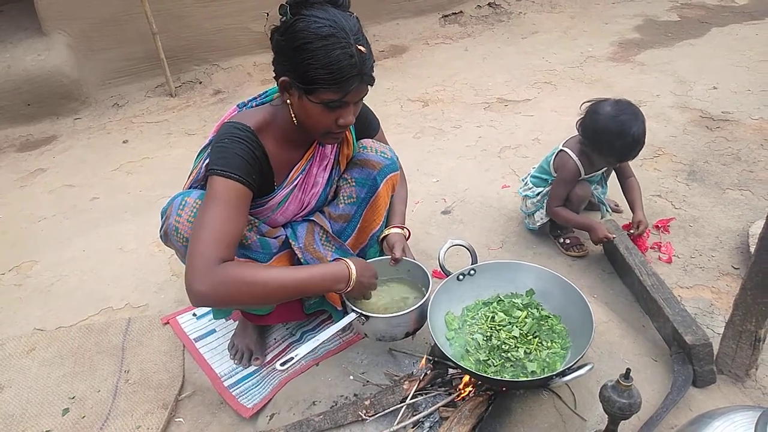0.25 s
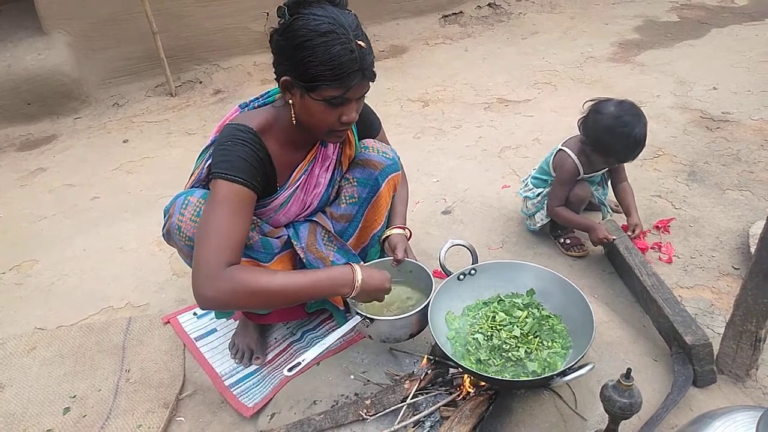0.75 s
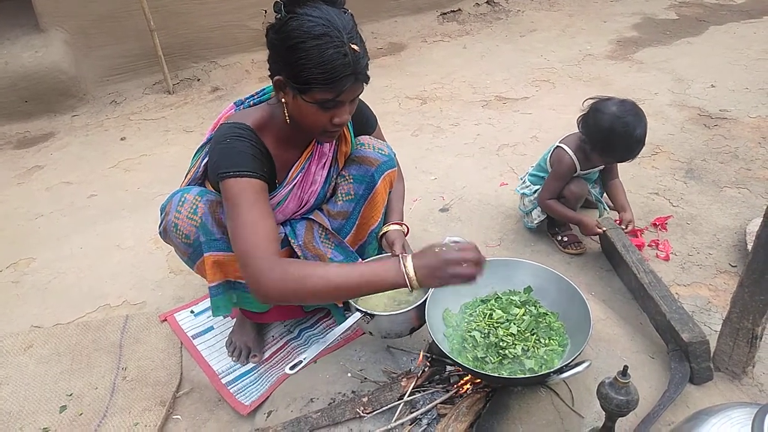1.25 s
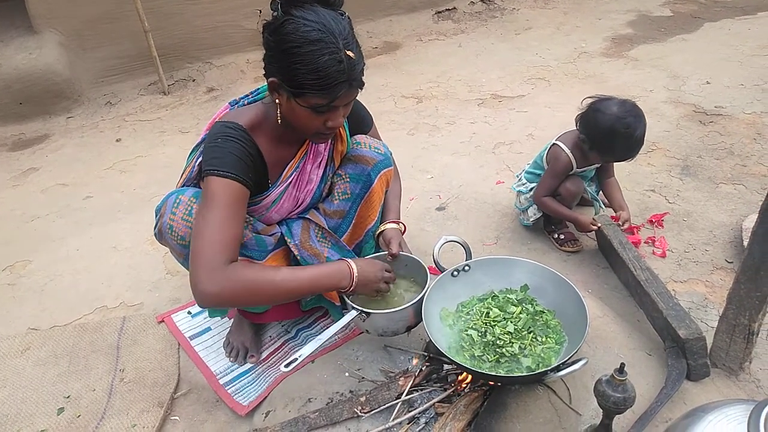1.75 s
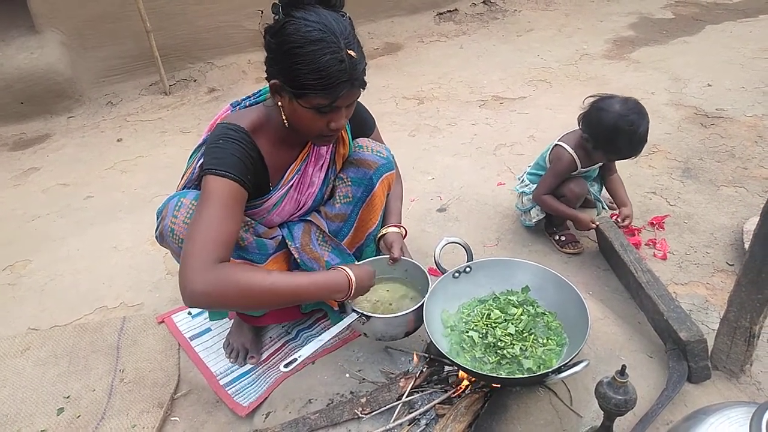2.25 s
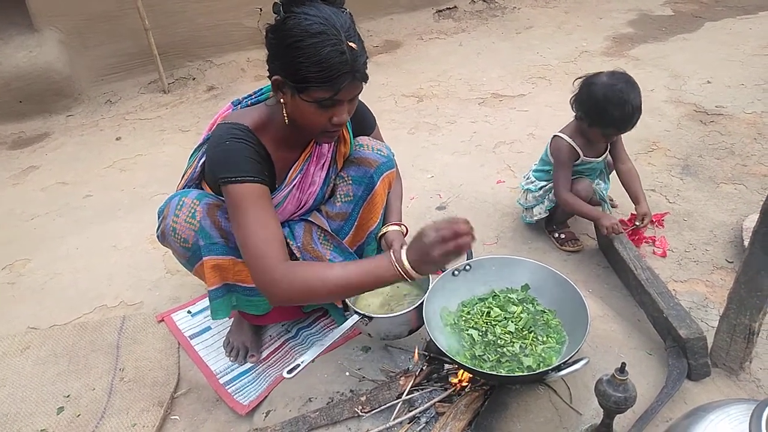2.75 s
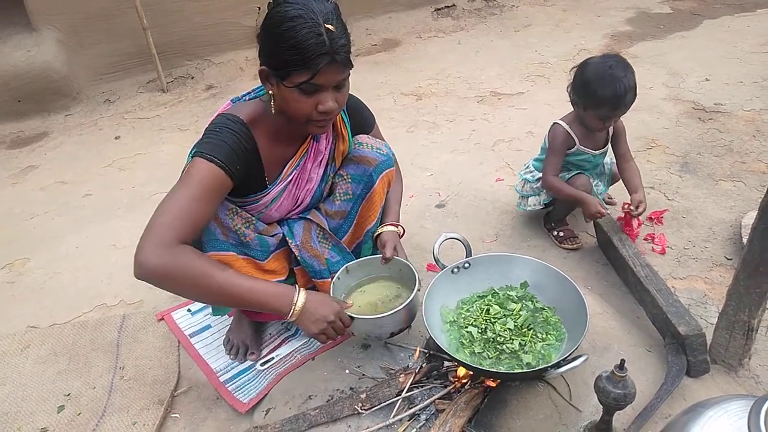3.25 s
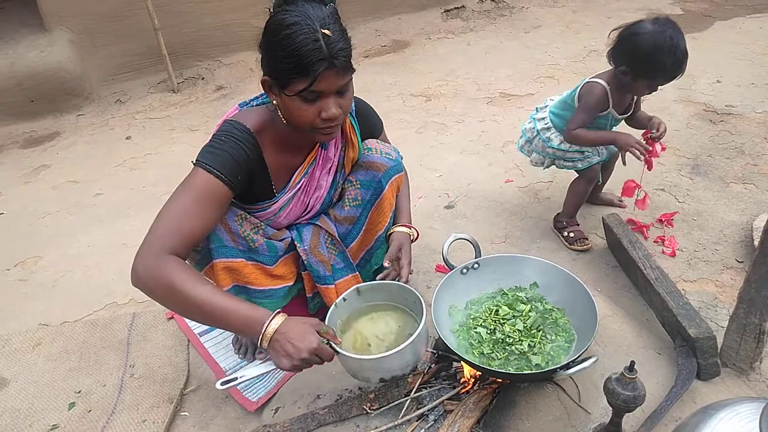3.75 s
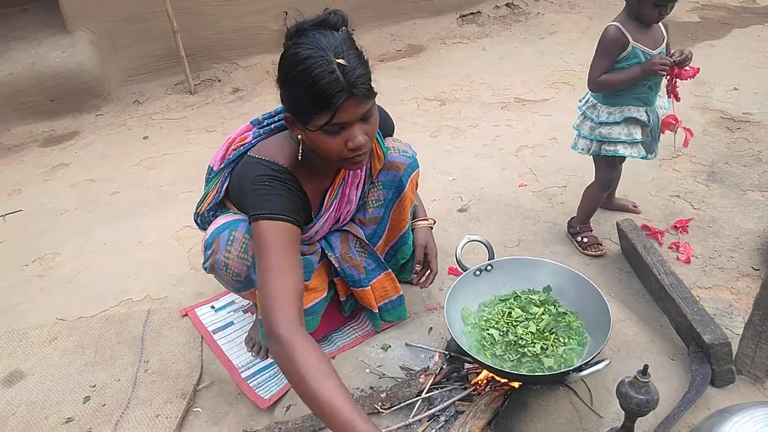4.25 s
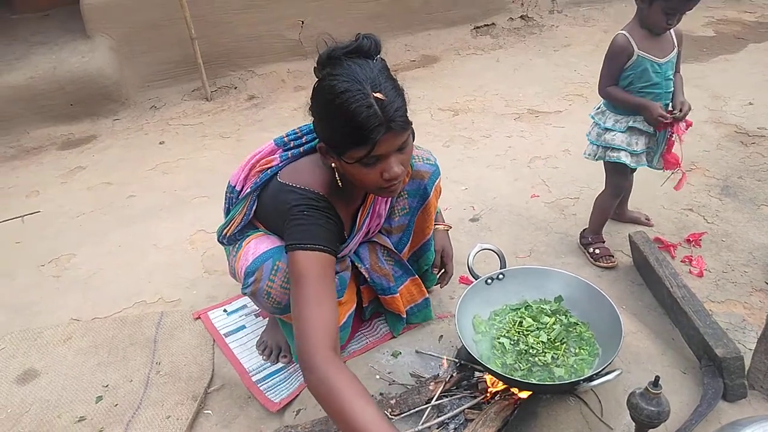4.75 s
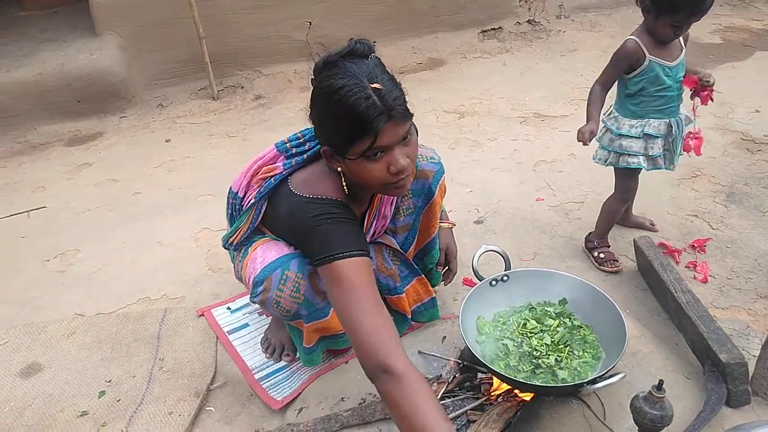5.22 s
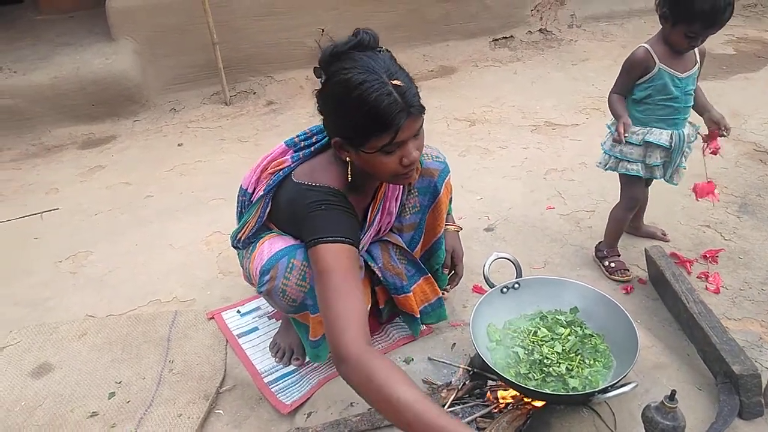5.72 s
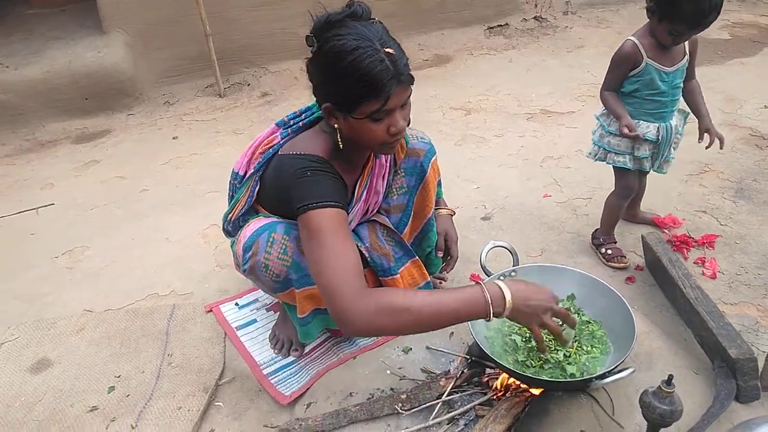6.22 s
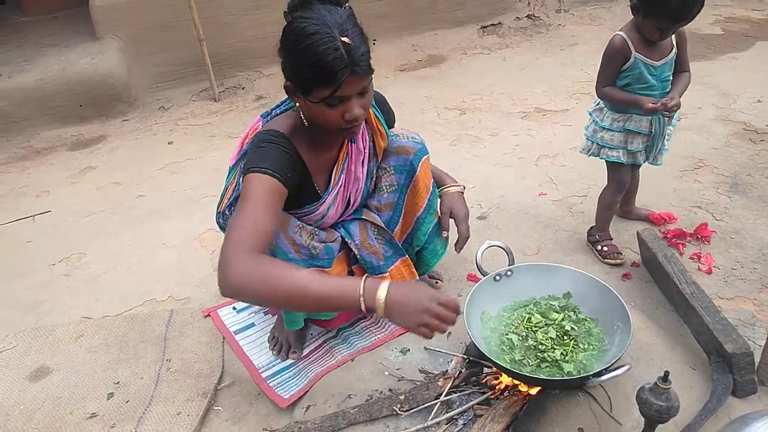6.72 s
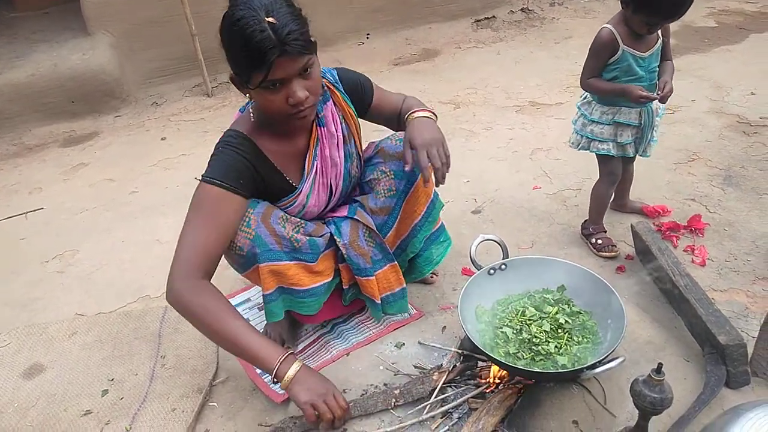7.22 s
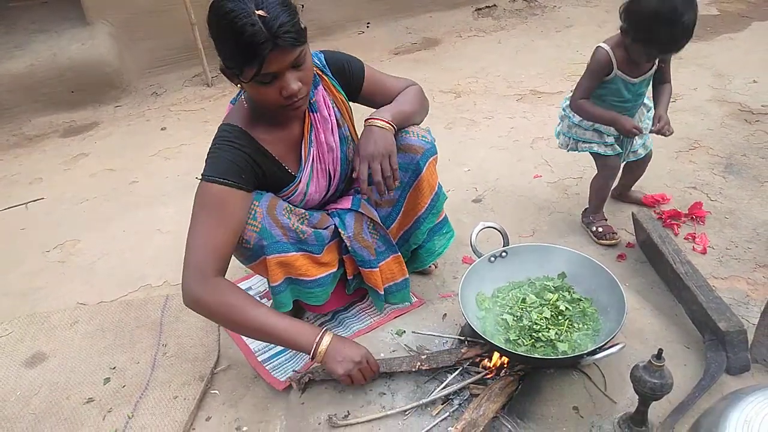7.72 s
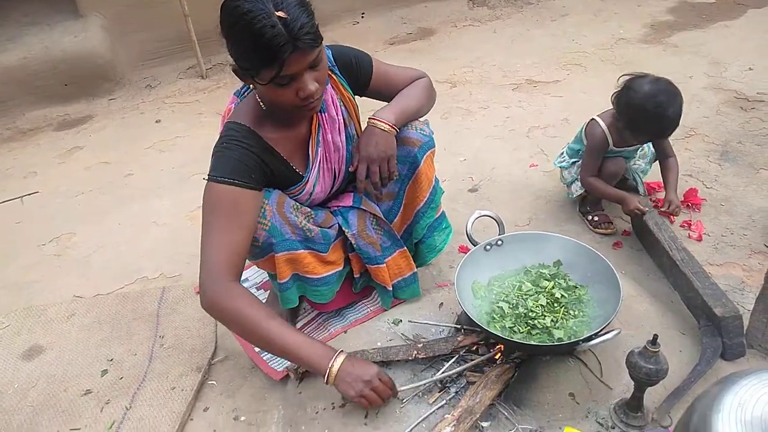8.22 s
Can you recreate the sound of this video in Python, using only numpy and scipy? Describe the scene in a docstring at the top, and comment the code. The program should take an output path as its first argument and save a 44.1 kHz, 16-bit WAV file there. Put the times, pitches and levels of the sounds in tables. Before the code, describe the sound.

Steady frying hiss in a quiet yard, with bangle clinks, a pot set on earth, ladle knocks, scraping tinware, then soft firewood bumps.

```python
"""Outdoor cooking in a yard, one microphone a step or two away: greens hiss in a pan over a wood fire throughout,
as shaped noise that sizzles up with bursts of droplets and steam when they are sprinkled or touched.
Bangles clink on the cook's wrist as struck modes, a steel pot of water is set on the ground, a ladle knocks against it,
and a steel tin is rattled and scraped until its lid rings free. Last, firewood is pushed under the pan with
thuds and rustles. A noise suppressor in the recorder hollows out the quietest bands; a thin whine lies over it all."""
import sys
import numpy as np
from scipy import signal
from scipy.fft import irfft
from scipy.io import wavfile
from scipy.ndimage import uniform_filter1d

SR = 44100
rng = np.random.default_rng(int(sys.argv[2]) if len(sys.argv) > 2 else 0)


def master_out(mix):
    """Clip the mix to full scale and print it as 16-bit PCM to the path in sys.argv[1]."""
    frames = np.transpose(np.atleast_2d(mix))
    ceiling = np.clip(frames, -1, 1)
    pcm = np.round(ceiling * 32767).astype(np.int16)
    wavfile.write(sys.argv[1], SR, pcm)


N = 373730
TIME = np.arange(N) / SR
AFTER = np.arange(2 ** 15) / SR  # time since a blow [s]
BINS = len(AFTER) // 2 + 1  # spectrum bins of one blow

# Spectra of the pan's steady hiss and brighter sizzle: (frequency [Hz], relative level [dB per Hz])
HISS = [(50, -13), (330, -28.5), (800, -21), (1120, -12), (1960, -2.5), (2400, -18.5), (3200, -18.5),
        (3700, -12.5), (5150, -6.5), (6050, -11.5), (6700, -28), (7700, -27.5), (8400, -13), (12500, -12),
        (16000, -26.5)]
SIZZLE = [(430, -50), (620, -10.5), (1150, 4), (1950, 4.5), (2400, -0.5), (2800, -16.5), (3500, -2.5),
          (5400, -2), (6400, -4), (7300, -16.5), (8400, -5.5), (11000, -1), (13000, -10), (16000, -13)]
# Spectrum of the steam, thinner than the hiss in the bass: (frequency [Hz], relative level [dB per Hz])
STEAM = [(350, -41.5), (650, -26), (1200, -11), (1950, 2.5)] + HISS[5:]
# Moisture meets the hot pan: (time [s], rise [s], hold [s], t60 [s], steam level [dB], spatter level [dB])
SIZZLES = [(1.476, 0.0079, 0.5, 0.57, -54.5, -57.5), (2.969, 0.12, 0.13, 1.06, -55.5, -47.5),
           (6.343, 0.2, 0.056, 5, -52.5, -46)]
# Strong modes of each steel vessel or tool: (frequency [Hz], level [dB], t60 [s])
POT_MODES = [(262, -2, 0.11), (703, -9.5, 0.64), (877, -13, 0.52), (1247, -7, 0.92), (1460, -6, 0.16),
             (1510, -12, 0.52), (1906, -12, 0.41)]
LADLE_MODES = [(1458, 1, 0.32), (3750, -2.5, 0.15), (4900, -8, 0.25)]
TIN_MODES = [(228, -27, 0.15), (1056, -9, 0.39), (1351, -2.5, 0.17), (1530, -3.5, 0.41), (2150, -6.5, 0.14),
             (3550, -20, 0.31), (5290, -2, 0.097)]
LID_MODES = [(258, -25.5, 0.34), (1043, -1, 0.28), (1344, -3, 0.17), (2240, -17, 0.074), (2580, -13, 0.15),
             (2890, -2.5, 0.1), (3780, -5, 0.095), (6240, 9, 0.027)]
# Crowded, short-lived modes of thin steel, low and high: (frequency [Hz], relative level [dB per Hz])
CLANK = [(330, -63), (540, -19.5), (900, -11.5), (1250, -5.5), (1600, -3.5), (1850, -6), (2250, -4),
         (2750, -15.5), (3500, -32.5)]
CLINK = [(500, -44), (1700, -35), (3000, -5.5), (3800, 0), (4800, 2), (5800, 0.5), (6700, -10), (9500, -6),
         (12500, -8.5), (16000, -25)]
# Blows on each piece of steel: (time [s], clank level [dB], clink level [dB], ring level [dB])
POT_BLOWS = [(4.4445, -33.5, -45.5, -34.5)]
LADLE_BLOWS = [(4.602, -48, -43, -56), (4.652, -47.5, -33, -44.5), (4.7045, -38.5, -33, -36),
               (4.745, -50, -45.5, -60)]
TIN_BLOWS = [(5.017, -40.5, -35, -30), (5.025, -39, -39, -34), (5.047, -38, -29, -36),
             (5.057, -36, -33, -50), (5.068, -46, -51, -27.5), (5.109, -38, -36.5, -51),
             (5.1465, -30.5, -30, -38), (5.161, -40, -49, -38), (5.18, -35.5, -29.5, -52),
             (5.256, -42, -41.5, -60), (5.362, -47.5, -32.5, -44)]
LID_BLOWS = [(5.416, -37, -39, -55), (5.433, -31.5, -39, -55), (5.4475, -26, -27, -54),
             (5.463, -27, -40, -38), (5.476, -35, -37, -38), (5.494, -29.5, -31.5, -26)]
# Strokes of steel on steel: (time [s], length [s], level at the end [dB])
SCRAPES = [(4.72, 0.074, -44), (5.015, 0.058, -37.5), (5.157, 0.14, -50), (5.357, 0.134, -36.5)]
# Slipping contacts, gliding as the contact moves: two faint squeaks of handling, then steel slipping on steel:
# (time [s], glide time [s], start frequency [Hz], end frequency [Hz], level [dB])
SQUEAKS = [(2.385, 0.04, 2430, 2420, -59), (3.472, 0.019, 2460, 2520, -60),
           (5.235, 0.0041, 5800, 5440, -33), (5.2383, 0.0029, 5400, 3330, -26.5),
           (5.256, 0.0062, 5440, 5280, -30), (5.2635, 0.0042, 5080, 4740, -30),
           (5.248, 0.0265, 860, 1343, -41.5), (5.277, 0.018, 3800, 2870, -45.5),
           (5.303, 0.019, 1410, 1840, -44), (5.362, 0.0099, 1500, 1520, -28),
           (5.379, 0.023, 3750, 3440, -38.5), (5.38, 0.022, 1610, 1500, -34),
           (5.413, 0.027, 1580, 1286, -33), (5.447, 0.0098, 1530, 1730, -20.5),
           (5.473, 0.022, 1498, 1234, -24.5), (5.576, 0.018, 4750, 5000, -46),
           (5.695, 0.013, 1910, 2160, -46), (5.755, 0.0045, 5720, 3660, -36)]
# The pot is swung down, pushed into place and settled: (time [s], length [s], level [dB])
POT_RUBS = [(3.69, 1, -73), (4.59, 0.22, -57.5), (4.88, 0.43, -60.5)]
# Hum of the hollow above the water: (frequency [Hz], relative level [dB per Hz])
HOLLOW = [(480, -29.5), (780, -2), (1250, -46), (2500, -16.5), (5000, -71)]
# Water slopping in the pot: (time [s], glide time [s], start frequency [Hz], end frequency [Hz], level [dB])
SLOPS = [(2.07, 0.056, 540, 620, -68), (2.43, 0.049, 453, 555, -69), (3.892, 0.047, 562, 574, -54),
         (3.912, 0.024, 558, 413, -52.5)]
# Modes of the bangles: (frequency [Hz], level [dB], t60 [s])
BANGLE_MODES = [(1994, -0.5, 0.056), (3580, -3, 0.074), (4870, 0, 0.049), (5400, 12, 0.021),
                (7470, -5.5, 0.1), (9250, -4.5, 0.071), (11350, -6, 0.076)]
# Bangles touch: (time [s], level [dB], favoured frequency [Hz])
BANGLE_TOUCHES = [(1.239, -48, 8200), (1.328, -47, 5300), (1.339, -37.5, 11000), (1.3959, -34.5, 12700),
                  (1.411, -33.5, 9100), (1.428, -44, 4700), (1.442, -39.5, 4260), (1.447, -41, 5340),
                  (2.8146, -47.5, 9200), (2.8962, -42, 11700), (2.9476, -46, 7300)]
# Light taps of utensils and dry sticks: (time [s], clank level [dB], clink level [dB])
TAPS = [(0.15, -58, -66), (1.486, -55, -57), (5.638, -61, -44), (5.7627, -44, -49.5), (6.141, -53, -59),
        (6.1937, -53.5, -46), (6.2486, -53.5, -43.5), (7.586, -44, -44), (7.622, -54, -53),
        (7.707, -57, -52)]
# Dull bumps on packed earth: (time [s], level [dB], centre frequency [Hz])
THUDS = [(0.294, -62.5, 193), (4.444, -43.5, 212), (4.603, -50.5, 200), (4.654, -49, 195),
         (4.704, -48, 200), (4.91, -63.5, 189), (5.239, -53.5, 255), (6.573, -59.5, 160), (7.515, -61, 239),
         (7.586, -57, 510), (7.705, -49, 362)]
# Cloth, hands and dry sticks brush past: (time [s], length [s], level [dB])
RUSTLES = [(.81, 0.036, -67), (6.166, 0.048, -49.5), (7.465, 0.1, -53.5), (7.57, 0.065, -59.5),
           (8.185, 0.06, -57.5)]
# Spectrum of dry fibres: (frequency [Hz], relative level [dB per Hz])
DRY_FIBRES = [(300, -53), (620, -6.5), (1150, -13), (1950, -1), (2700, -11), (3500, -8.5),
              (5400, -5), (7300, -22), (9500, -8), (16000, -27.5)]
# Threshold of the recorder's noise suppressor: (frequency [Hz], level in a narrow band [dB])
QUIET = [(300, -112), (1000, -82.5), (2700, -83.5), (4000, -73.5), (7500, -87), (9000, -102)]

HISS_DB = -57.5
SPATTER_HOLD, SPATTER_T60_S = 0.36, 2.32  # share of the steam's hold time, and longest decay
WALL_DELAY_S, WALL_DB = 0.00262, -16.5  # the pan's curved wall throws its own sizzle back
CLATTER_T60_S, FIRM_DB = 0.059, -31  # clatter of a blow at least this firm
DOUBLING_DB = 7.5  # lighter contact damps less: t60 doubles for each such step under firm
CLINK_T60_S = 0.14  # longest decay of the high clatter
SHIMMER_T60_S, SHIMMER_CLINK_DB = 0.47, -7  # weak modes linger under the ring, the high part fainter
TWIN_SPLIT, TWIN_DB = 0.013, -14  # nothing is perfectly round: a weaker twin, lower by this share, beats
SCRAPE_GROWTH_DB, SCRAPE_T60_S = 11, 0.019
RUB_RISE_S, RUB_T60_S = 0.0081, 0.37
BANGLE_TICK_DB, BANGLE_FOCUS_DB = -10.5, 13
TAP_T60_S, TICK_T60_S = 0.16, 0.067  # the body of a tap, and its bright tick
THUD_CYCLES = 45  # a bump dies by 60 dB in this many cycles
RUSTLE_RISE_S, RUSTLE_T60_S = 0.021, 0.74
WHINE_HZ, WHINE_DB, EDGE_HZ = 14000, -68.5, 16200


def pan():
    """Steady hiss; on hot metal droplets burst first, steam hisses on, and the wall's echo makes it hollow."""
    hiss = amp(HISS_DB) * unit(colour(patchy_noise(patchy_db=3.5), HISS))
    droplets = unit(patchy_noise(patchy_db=2.2)) + amp(-3) * unit(grains(per_s=700, spread_db=5))
    spatter = unit(colour(droplets, SIZZLE))
    steam = unit(colour(patchy_noise(patchy_db=1), STEAM))
    direct = hiss
    for s, rise, hold, t60, steam_db, spatter_db in SIZZLES:
        direct = direct + amp(steam_db) * swell(s, rise, hold, t60) * steam
        spattering = swell(s, rise, SPATTER_HOLD * hold, min(t60, SPATTER_T60_S))
        direct = direct + amp(spatter_db) * spattering * spatter
    echo = np.interp(TIME - WALL_DELAY_S, TIME, direct)
    return direct + amp(WALL_DB) * echo


def steel(blows, modes, pitch, shimmer_db):
    """Each blow clatters crowded modes (lower in a big vessel); strong modes ring over a faint shimmer."""
    out = np.zeros(N)
    low, high = crowd(spacing_hz=16), crowd(spacing_hz=30.1)
    clank = [(hz * pitch, db) for hz, db in CLANK]
    for s, clank_db, clink_db, ring_db in blows:
        lightness_db = max(FIRM_DB - max(clank_db, clink_db), 0)
        t60 = CLATTER_T60_S * 2 ** (lightness_db / DOUBLING_DB)
        low_clatter = clatter(low * strike_point(uneven_db=4), clank, t60)
        high_clatter = clatter(high * strike_point(uneven_db=6), CLINK, min(t60, CLINK_T60_S))
        add(out, s, amp(clank_db) * low_clatter)
        add(out, s, amp(clink_db) * high_clatter)
        shimmer = clatter(low, clank, SHIMMER_T60_S)
        shimmer = shimmer + amp(SHIMMER_CLINK_DB) * clatter(high, CLINK, SHIMMER_T60_S)
        add(out, s, amp(ring_db) * (ring(modes, uneven_db=2.2) + amp(shimmer_db) * shimmer))
    return out


def scrape():
    """Small slips keep thin steel chattering, pressed harder as they go; it sings on faintly after."""
    low_body = clatter(1, [(650, -28)] + CLANK[2:], 0.048)
    body = low_body + amp(3.5) * clatter(1, CLINK, 0.011)
    pressure = np.zeros(N)
    for s, length, end_db in SCRAPES:
        remaining = np.clip(1 - (TIME - s) / length, 0, 1)
        stroke = swell(s, 0.0024, length, SCRAPE_T60_S)
        singing_on = amp(-12) * swell(s, length, 0, 1)
        pressure += amp(end_db - SCRAPE_GROWTH_DB * remaining) * (stroke + singing_on)
    slips = grains(per_s=3000, spread_db=4.5)
    return pressure * unit(signal.oaconvolve(slips, body)[:N])


def glides(table, jitter_hz):
    """Squeaks and slops: a resonance glides unsteadily, swells quickly, then fades at its end pitch."""
    out = np.zeros(N)
    for s, length, start_hz, end_hz, db in table:
        u = np.linspace(0, 2, int(2 * length * SR))  # time in glide times
        wander = unit(smooth(rng.standard_normal(len(u)), 50, 36))
        hz = np.interp(u, [0, 1], [start_hz, end_hz]) + jitter_hz * wander
        envelope = (u * np.e / 0.4) ** 2 * np.exp(-2 * u / 0.4)  # peaks at one, at u = 0.4
        tone = np.sqrt(2) * np.sin(2 * np.pi * np.cumsum(hz) / SR)
        add(out, s, amp(db) * envelope * tone)
    return out


def rubbed_pot():
    """Water and grit rub the pot, which hums in the hollow above the water."""
    rubs = grains(per_s=2200, spread_db=0)
    return strokes(POT_RUBS, RUB_RISE_S, RUB_T60_S) * unit(colour(rubs, HOLLOW))


def bangles():
    """Thin rings tick and ring briefly, damped by the wrist; each touch favours other modes."""
    out = np.zeros(N)
    for s, db, favoured_hz in BANGLE_TOUCHES:
        tick_spectrum = [(2500, -24), (3800, -5), (favoured_hz, 0), (favoured_hz * 3, -18)]
        tick = clatter(crowd(spacing_hz=102), tick_spectrum, 0.012)
        modes = []
        for hz, level, t60 in BANGLE_MODES:
            octaves_off = abs(np.log2(hz / favoured_hz))
            modes.append((hz, level - BANGLE_FOCUS_DB * octaves_off ** 0.5, t60))
        add(out, s, amp(db) * (ring(modes, uneven_db=7) + amp(BANGLE_TICK_DB) * tick))
    return out


def taps():
    """Damped knocks: a sharp tick over a short, dull body that leaves no ring."""
    out = np.zeros(N)
    for s, clank_db, clink_db in TAPS:
        add(out, s, amp(clank_db) * clatter(1, CLANK, TAP_T60_S))
        add(out, s, amp(clink_db) * clatter(1, CLINK, TICK_T60_S))
    return out


def thuds():
    """Pot, feet and firewood bump the ground with a low, broad resonance."""
    out = np.zeros(N)
    for s, db, hz in THUDS:
        hump = [(hz / 3, -28), (hz / 1.65, -2), (hz * 1.326, 0), (hz * 2.04, -19), (hz * 6, -60)]
        add(out, s, amp(db) * clatter(1, hump, THUD_CYCLES / hz))
    return out


def rustles():
    """Dry fibres catch and slip in a fine, uneven crackle."""
    fibres = unit(patchy_noise(patchy_db=6.5)) + unit(grains(per_s=480, spread_db=6.5))
    catching_db = 2 * unit(smooth(rng.standard_normal(N), 1200, 400))
    brushing = strokes(RUSTLES, RUSTLE_RISE_S, RUSTLE_T60_S) * amp(catching_db)
    return brushing * unit(colour(fibres, DRY_FIBRES))


def yard(x, wet_db, t60):
    """Ground and mud walls return a faint, short scatter."""
    tail = rng.standard_normal(len(AFTER)) * amp(-60 * AFTER / t60)
    tail = tail * (AFTER > 0.008)  # nothing returns sooner [s]
    return x + amp(wet_db) * signal.oaconvolve(x, tail / np.linalg.norm(tail))[:N]


def suppress(x, slope, depth_db):
    """Noise suppressor: the further a narrow band falls under the threshold, the more it is turned down."""
    hz, _, z = signal.stft(x, SR, nperseg=1024, noverlap=768)
    power = uniform_filter1d(abs(z) ** 2, size=3, axis=-2)
    power = uniform_filter1d(power, size=7, axis=-1)
    threshold_db = np.interp(hz, *np.transpose(QUIET))[:, None]
    under_db = threshold_db - 10 * np.log10(abs(power) + 1e-20)
    gain = amp(-np.clip(slope * under_db, 0, depth_db))
    return signal.istft(z * gain, nperseg=1024, noverlap=768)[1][:, :N]


def ring(modes, uneven_db):
    """Damped pairs of modes that beat; each blow lands elsewhere and shares its energy differently."""
    twins = [(hz * (1 - TWIN_SPLIT), db + TWIN_DB, t60) for hz, db, t60 in modes]
    out = np.zeros(len(AFTER))
    for hz, db, t60 in list(modes) + twins:
        level_db = db + uneven_db * rng.standard_normal() - 60 * AFTER / t60
        out += amp(level_db) * np.sin(2 * np.pi * (hz * AFTER + rng.random()))
    onset = 1 - np.exp(-AFTER / 0.0028)  # the ring builds up over a few cycles
    return onset * out


def crowd(spacing_hz):
    """Picks the frequencies of a crowd of modes, as a mask on the spectrum."""
    return rng.random(BINS) < SR / len(AFTER) / spacing_hz


def strike_point(uneven_db):
    """Where a blow lands decides which groups of modes it favours: a lumpy gain over frequency."""
    lumps = smooth(rng.standard_normal(BINS), 220, 120)
    return amp(uneven_db * np.tanh(unit(lumps)))


def clatter(mask, spectrum, t60):
    """A crowd of modes struck at once and dying away, with an early rms of about one."""
    modes = irfft(mask * np.exp(2j * np.pi * rng.random(BINS)))
    envelope = amp(-60 * AFTER / t60) * (1 - np.exp(-AFTER / 0.001))
    x = colour(modes * envelope, spectrum)
    early_share = 1 - amp(-60 * 0.01 / t60) ** 2  # energy share of the first hundredth of a second
    return x / np.sqrt(early_share * np.sum(x ** 2) / (SR / 100))


def patchy_noise(patchy_db):
    """Noise drifting in small patches of time and frequency, less so in the deep bass and the treble."""
    hz, _, z = signal.stft(rng.standard_normal(N), SR, nperseg=1024, noverlap=768)
    patches = uniform_filter1d(rng.standard_normal(z.shape), size=4, axis=0)
    patches = uniform_filter1d(patches, size=11, axis=1)
    depth_db = patchy_db * (hz / (hz + 150) / (1 + (hz / 6500) ** 4))[:, None]
    return signal.istft(z * amp(depth_db * unit(patches)), nperseg=1024, noverlap=768)[1][:N]


def grains(per_s, spread_db):
    """Random clicks, most small and a few large; all equal at zero spread."""
    size_db = spread_db * np.minimum(rng.exponential(1, N), 3.5)
    return (rng.random(N) < per_s / SR) * rng.choice([-1, 1], N) * amp(size_db)


def swell(s, rise, hold, t60):
    """Gain over time: rises from time s, holds, then dies away."""
    dying_s = np.maximum(TIME - s - rise - hold, 0)
    return np.clip((TIME - s) / rise, 0, 1) * amp(-60 * dying_s / t60)


def strokes(table, rise, t60):
    """Gain over time of rubbing strokes that share one attack and release."""
    return sum(amp(db) * swell(s, rise, length - rise, t60) for s, length, db in table)


def colour(x, spectrum):
    """Causal (minimum-phase) filter from (Hz, dB) points joined on a log-frequency axis."""
    hz, db = np.transpose(spectrum)
    f = abs(np.fft.fftfreq(4096, 1 / SR)) + 1
    log_gain = np.log(amp(np.interp(np.log(f), np.log(hz), db)))
    response = np.exp(signal.hilbert(log_gain).conj())
    impulse = np.fft.ifft(response).real[:len(f) // 2]
    return signal.oaconvolve(x, impulse)[:len(x)]


def smooth(x, first, second):
    """Two running means, with widths in samples or bins."""
    return uniform_filter1d(uniform_filter1d(x, size=first), size=second)


def amp(db):
    """Decibels to gain."""
    return 10 ** (np.asarray(db) / 20)


def unit(x):
    """Scales to an rms of one."""
    return x / np.sqrt(np.mean(x ** 2) + 1e-20)


def add(mix, s, sound):
    """Lays a sound into the mix at time s."""
    part = mix[round(s * SR):][:len(sound)]
    part += sound[:len(part)]


def scene():
    """All sources, a step or two from one microphone; the pan is heard without the yard's scatter."""
    pot = steel(POT_BLOWS, POT_MODES, pitch=0.64, shimmer_db=-10) + rubbed_pot()
    ladle = steel(LADLE_BLOWS, LADLE_MODES, pitch=0.81, shimmer_db=-13)
    tin = steel(TIN_BLOWS, TIN_MODES, pitch=0.87, shimmer_db=-16)
    lid = steel(LID_BLOWS, LID_MODES, pitch=0.96, shimmer_db=-24)
    friction = scrape() + glides(SQUEAKS, jitter_hz=80)
    handling = bangles() + taps() + thuds() + rustles() + glides(SLOPS, jitter_hz=35)
    around_pan = yard(pot + ladle + tin + lid + friction + handling, wet_db=-16, t60=0.27)
    return (pan() + around_pan)[None]


def record(dry):
    """Noise suppression, a thin electronic whine, then the band limit."""
    hushed = suppress(dry, slope=1.3, depth_db=20)
    whine = amp(WHINE_DB) * np.sqrt(2) * np.sin(2 * np.pi * WHINE_HZ * TIME)
    band_limit = signal.firwin(511, EDGE_HZ, window=("kaiser", 9), fs=SR)[None]
    return signal.oaconvolve(hushed + whine, band_limit, "same")


dry = scene()
out = record(dry)
master_out(out)
```